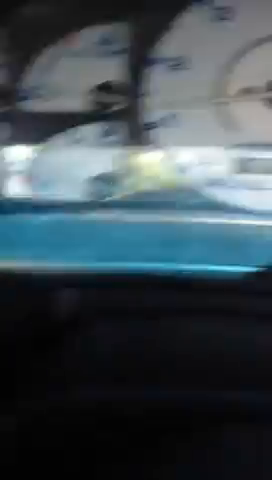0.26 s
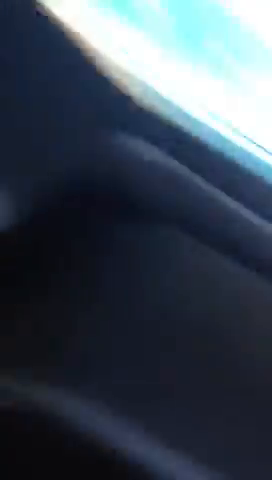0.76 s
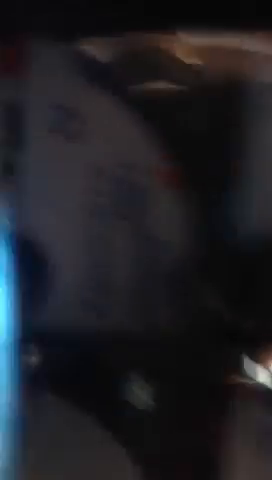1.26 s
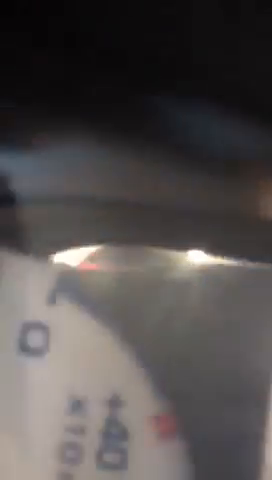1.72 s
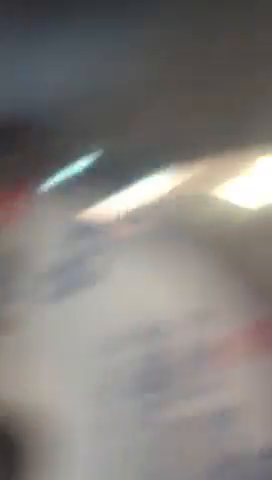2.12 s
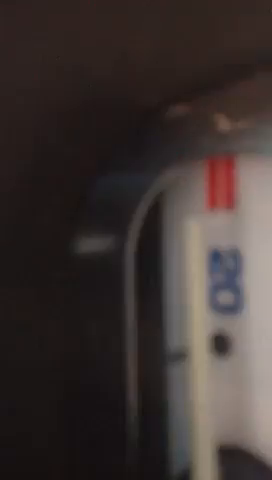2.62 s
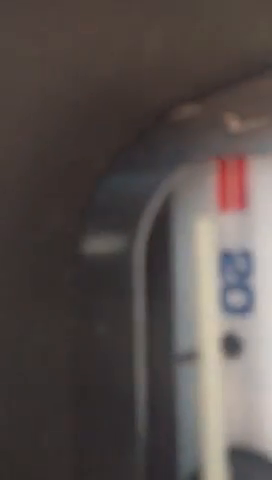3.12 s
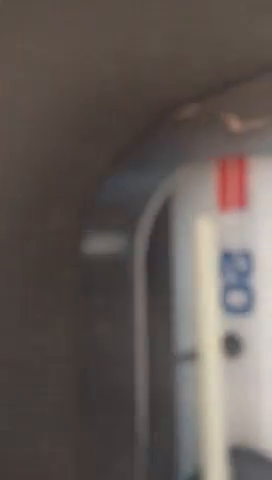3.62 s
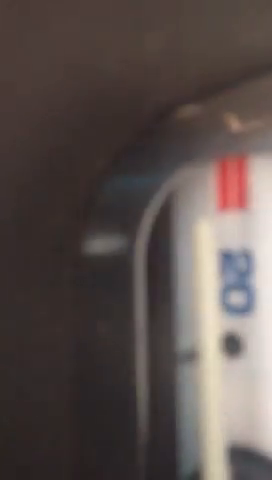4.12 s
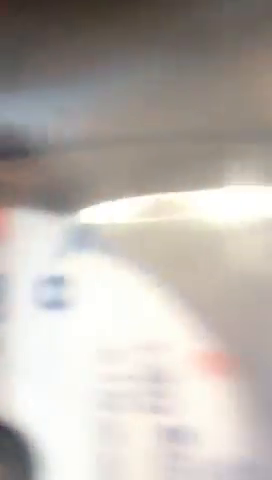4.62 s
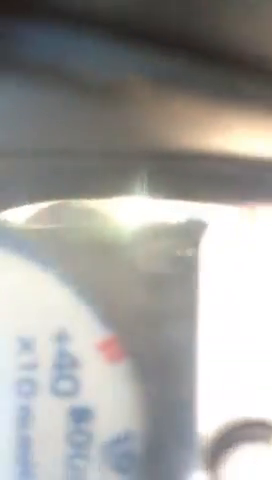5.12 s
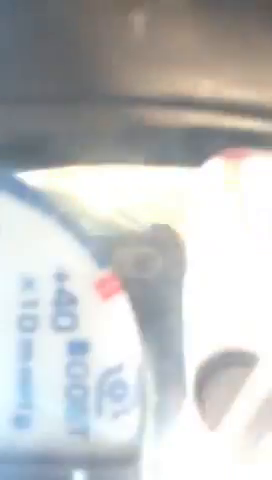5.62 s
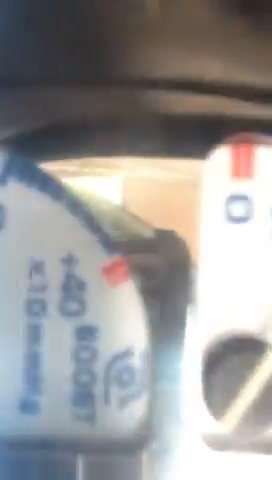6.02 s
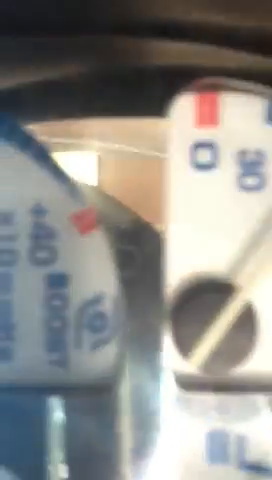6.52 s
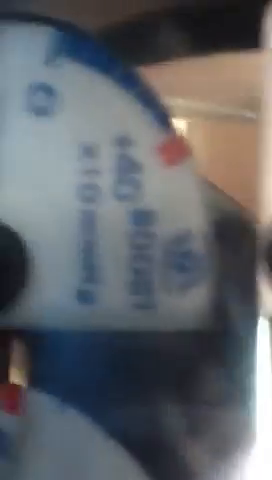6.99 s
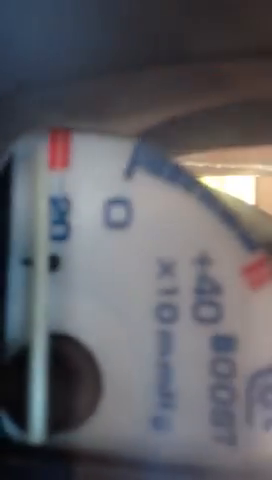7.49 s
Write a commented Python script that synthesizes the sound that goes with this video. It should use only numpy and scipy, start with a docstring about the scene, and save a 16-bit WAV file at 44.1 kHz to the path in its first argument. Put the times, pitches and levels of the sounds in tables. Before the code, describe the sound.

Lumpy engine idle in a car cabin, close handling knocks and scrapes, then the throttle opens into a droning, raspy, airy climb.

```python
"""Turbocharged rotary car with a fumbled phone

Inside the car, the engine idles while a phone is fumbled against the dashboard, then pulls away and revs up.
Each firing is a pulse that booms through exhaust and cabin resonances and shakes a piece of loose trim.
Noise that throbs with the firings makes the roar and rasp of gas and the hiss of the intake under boost.
Fingers rub the phone's case (grainy noise) and knock it (ringing thuds with noisy cracks); the trim ticks."""
import sys
import numpy as np
from scipy import signal
from scipy.fft import rfft, irfft
from scipy.io import wavfile
from scipy.ndimage import uniform_filter1d

SR = 44100
rng = np.random.default_rng(int(sys.argv[2]) if len(sys.argv) > 2 else 0)


def store_wav(level_fs):
    """Save 16-bit WAV to argv[1]."""
    pcm = np.round(np.clip(np.atleast_2d(level_fs), -1, 1) * 32767)
    wavfile.write(sys.argv[1], SR, pcm.T.astype(np.int16))


N = 341775
T = np.arange(N) / SR  # time of each sample, in seconds
SIZE = 16384  # length of filters and bursts, in samples
FREQ = np.maximum(np.fft.rfftfreq(SIZE, 1 / SR), 1)  # frequencies of a filter, in Hz
# the throttle opens once and stays open
THROTTLE_S, THROTTLE_RISE_S = 3.189, 0.22


def undb(db):
    """Turn decibels into a plain gain."""
    return 10 ** (np.asarray(db) / 20)


def unit(x):
    """Scale to an rms of 1."""
    return x / np.sqrt(np.mean(x ** 2))


def curves(table):
    """Draw each column of a table of (start_s, ..) rows as a line, sample by sample."""
    s, *columns = np.transpose(table)
    return [np.interp(T, s, column) for column in columns]


def slope(points):
    """Gain over frequency, drawn through (pitch_hz, level_db) points."""
    hz, db = np.transpose(points)
    return undb(np.interp(np.log(FREQ), np.log(hz), db))


def resonances(modes):
    """Gain over frequency of steep-sided resonances; each width is roughly that at half height."""
    power = 0
    for hz, width, db in modes:
        detuning = (FREQ / hz - hz / FREQ) * hz / width / 1.5
        power = power + (undb(db) / (1 + detuning ** 2 * 2)) ** 2
    return np.sqrt(power)


def ring(gain):
    """Impulse response with this gain over frequency, which starts at once and never before the hit."""
    cepstrum = irfft(np.log(gain + 1e-6))
    # folding the second half onto the first gives minimum phase
    cepstrum[1:SIZE // 2] *= 2
    cepstrum[SIZE // 2 + 1:] = 0
    return irfft(np.exp(rfft(cepstrum)))


def through(x, gain):
    """Pass a sound through a body with this gain over frequency."""
    return signal.fftconvolve(x, ring(gain))[:len(x)]


def noise(points, envelope=1):
    """Noise under an envelope, coloured by a spectrum, with an rms of 1."""
    return unit(through(envelope * rng.standard_normal(N), slope(points)))


def walk(rate_hz):
    """Smooth random wandering with an rms of 1."""
    k = max(int(SR / rate_hz), 2)
    steps = np.repeat(rng.standard_normal(N // k + 1), k)
    return unit(uniform_filter1d(uniform_filter1d(steps, k), k)[:N])


def add(out, s, sound):
    """Mix a sound in at a time in seconds."""
    i = int(s * SR)
    out[i:i + len(sound)] += sound[:N - i]


def swell(s, length):
    """A smooth rise and fall around a moment, both in seconds."""
    return np.cos(np.pi * np.clip((T - s) / length, -.5, .5)) ** 2


def burst(t60):
    """Noise that dies away by 60 dB in t60 seconds."""
    return rng.standard_normal(SIZE) * undb(-60 * T[:SIZE] / t60)


def firings(turns, load, load_scatter_db=1.0, misfire_s=.25, misfire_db=-15):
    """One pulse a firing, from two rotors in turn, uneven in size and timing; one misfires at idle."""
    jitter_s, idle_scatter_db = .00003, .8
    rotor_gap_db = 1.3  # one rotor fires a little harder at idle
    count = np.arange(1, int(turns[-1]) + 1)
    at = np.interp(count, turns, T)
    chance = rng.standard_normal((len(at), 2))
    idling = 1 - np.interp(at, T, load)
    scatter = load_scatter_db + idling * (idle_scatter_db - load_scatter_db)
    size = undb(chance[:, 0] * scatter + idling * rotor_gap_db * (count % 2 - 1.0))
    size[np.argmin(abs(at - misfire_s))] *= undb(misfire_db)
    # a pulse between two samples is shared out between them
    place = np.clip((at + jitter_s * chance[:, 1]) * SR, 0, N - 2)
    i = place.astype(int)
    pulses = np.zeros(N)
    pulses[i], pulses[i + 1] = size * (1 - place % 1), size * (place % 1)
    return pulses


def exhaust(pulses, hz, load, soft_hz=270, bark_db=0.0, pipe_hz=370, pipe_width_hz=70, pipe_db=0):
    """Pulses ring the cabin, booming when a harmonic meets a resonance; the throttle adds upper bark."""
    # exhaust and cabin resonances: pitch_hz [Hz], width_hz [Hz], level_db [dB, relative]
    cabin = [(69.3, 30.7, -17), (90.3, 22.8, -10), (108.2, 27, -15), (158.5, 28.7, -3.5), (186.04, 20.1, 4),
             (202.2, 21.8, 3.5), (216.9, 13.8, -1), (245.8, 49.6, -9.5), (297.7, 63.4, -10.5),
             (357, 15.6, -17.5), (380, 15, -20), (509, 47.4, -21.5), (602, 26, -29), (687, 44, -36.5),
             (790.3, 39, -26), (905, 41, -30), (1023, 55, -40)]
    boom_db = -13.5
    # a standing wave in the cabin weakens one band at the phone; half the dB remain one half-width away
    null_hz, null_half_width_hz, null_db = 128.6, 6.2, -9
    null = undb(null_db / (1 + ((FREQ - null_hz) / null_half_width_hz) ** 2))
    full = through(pulses, null * resonances(cabin))
    low_pass = signal.butter(3, soft_hz, fs=SR, output="sos")
    soft = signal.sosfiltfilt(low_pass, np.pad(full, SIZE))[SIZE:-SIZE]
    bark = load * undb(bark_db) * (full - soft)
    # the tailpipe's resonance builds up at higher revs
    pipe = signal.lfilter(*signal.iirpeak(pipe_hz, pipe_hz / pipe_width_hz, fs=SR), bark)
    boom = soft + bark + undb(pipe_db) * np.interp(hz, [60, 76], [0, 1]) * pipe
    # each harmonic's level is set by the cabin alone, however fast the firings come
    return boom * SR / hz / np.sqrt(2) * undb(boom_db)


def idle_air(turns, air_db=-44, throb=0.22):
    """Soft engine-bay noise that throbs with the firings, and two faint tones that die away early."""
    # colour of the noise: pitch_hz [Hz], level_db [dB, relative]
    air_colour = [(30, 1), (200, 11), (400, 5), (550, -5), (820, -6.5), (1120, -13), (1250, -11),
                  (1550, -16), (2500, -19.5), (5000, -26.5), (8000, -29), (15500, -38.5)]
    # faint wavering tones: pitch_hz [Hz, on average], level_db [dB, rms]
    whine = [(420, -53), (673, -56)]
    half_faded_s, fade_s = .68, 0.5
    air = undb(air_db) * noise(air_colour, np.exp(throb * np.cos(2 * np.pi * turns)))
    tones = np.zeros(N)
    for hz, db in whine:
        cycles = np.cumsum(hz * (1 + 0.0022 * walk(20))) / SR
        tones += undb(db) * np.sqrt(2) * np.sin(2 * np.pi * cycles)
    return air + tones * np.clip((half_faded_s - T) / fade_s + .5, 0, 1)


def rubbing(rub_db=2.5, grain_db=0.0, catch_db=2.5, crackle_db=-5, fidget_spread_db=2.5):
    """Skin strokes swell and fade over the case: tiny slips, and sparse crackles where it catches."""
    # colour of skin on the case: pitch_hz [Hz], level_db [dB, relative]
    skin = [(150, -23), (400, 16), (800, 11.5), (1300, 4), (2200, 2.5), (4500, 2), (5700, -1.5), (7200, 0),
            (9500, -7), (12000, -4), (15500, -11)]
    # firm strokes of fingers: middle_s [s], length_s [s], level_db [dB, before the gain rub_db]
    rubs = [(0.972, 0.11, -50.5), (1.082, .12, -58), (1.425, 0.16, -39.5), (1.538, 0.27, -46),
            (1.709, 0.084, -46), (1.841, 0.15, -38), (2.045, 0.28, -51.5), (2.164, 0.16, -42.5),
            (2.327, 0.38, -41.5), (2.461, 0.17, -35), (3.188, 0.13, -52)]
    # light fidgeting goes on between the strokes and grows until the phone comes to rest
    fidget_end_s, fidget_growth_db_per_s = 2.56, 7
    fidget_db = -56.5  # at its end, before rub_db
    strokes = sum(undb(db) * swell(s, length) for s, length, db in rubs)
    left_s = np.maximum(fidget_end_s - T, 0)
    fidget_level = fidget_db - fidget_growth_db_per_s * left_s + fidget_spread_db * walk(13.98)
    fidget = (left_s > 0) * undb(fidget_level)
    slips = noise(skin, undb(grain_db * walk(900) + catch_db * walk(60)))
    crackles = noise(skin, rng.random(N) < 250 / SR)  # about 250 a second
    return undb(rub_db) * np.hypot(strokes, fidget) * (slips + undb(crackle_db) * crackles)


def knocks(thud_db=3, crack_db=0, spread=0.91, chatter=0.04, chatter_s=0.08):
    """Each knock thuds the case's resonances, weighted by where it lands, and cracks at the contact."""
    # phone case resonances: pitch_hz [Hz], width_hz [Hz], level_db [dB, relative]
    case_modes = [(171, 160, 9.5), (378, 103, 1.5), (548, 120, -0.5), (730, 300, -2.5), (915, 110, -22),
                  (1260, 62, -18), (1710, 440, -17.5), (2260, 720, -12.5)]
    # knocks on case and trim: start_s [s], thud_db [dB, before the gain thud_db], thud_centre_hz [Hz],
    # crack_db [dB, before the gain crack_db], crack_decay_s [s, to fall 60 dB]
    hits = [(.567, -36, 805, -41.5, 0.023), (1.225, -14, 2206, -22.5, 0.081), (1.249, -18, 790, -31, 0.14),
            (1.284, -24, 885, -33, 0.053), (1.324, -7.5, 780, -31.5, 0.086), (1.403, -5, 690, -20.5, .035),
            (1.614, -9.5, 330, -22.5, 0.06), (1.619, -12.5, 650, -24, 0.066), (1.740, -25, 930, -38.5, .05),
            (1.796, -31, 750, -41, .05), (1.847, -6, 656, -24.5, 0.048), (1.883, -21, 900, -34.5, 0.085),
            (1.949, -14.5, 613, -33.5, 0.026), (2.08, -20.5, 520, -38, 0.022),
            (2.252, -22, 699.3, -35, .06), (2.443, -7.5, 510, -20.5, .044), (2.451, -12, 500, -20, 0.024),
            (2.462, -4.5, 420, -10.5, 0.023), (2.469, -14, 420, -11.5, 0.033),
            (2.489, -11.5, 450, -37, 0.11), (2.975, -41, 811, -55, 0.081), (3.191, -30, 880, -38.5, .13),
            (5.906, -16, 756, -26.5, 0.027), (5.931, -22, 1490, -29.5, 0.031),
            (6.406, -20.5, 898, -45, .023), (7.076, -9, 1210, -30, .025)]
    # colour of the cracks: pitch_hz [Hz], level_db [dB, relative]
    crack_colour = [(300, -0.5), (900, 11), (1300, 10.5), (2200, 5), (3200, 1), (4200, 0.5), (5500, -6.5),
                    (7700, -5), (9500, -12), (12500, -15.5), (15500, -17)]
    thuds, cracks, case = np.zeros(N), np.zeros(N), resonances(case_modes)
    for s, db, hz, sharp_db, t60 in hits:
        # one sharp push, then a faint noisy chatter
        push = chatter * burst(chatter_s)
        push[0] += 1
        landing = 1 / (1 + (np.log(FREQ / hz) / spread) ** 2) ** 2
        thud = through(push, case * landing)
        add(thuds, s, undb(db + thud_db) * thud / abs(thud).max())
        add(cracks, s, undb(sharp_db + crack_db) * burst(t60))
    return thuds + through(cracks, unit(slope(crack_colour)))


def ticks(tick_db=-2, t60=0.027):
    """Thin, bright clicks of plastic: short bursts of coloured noise."""
    # light clicks of case and trim: start_s [s], level_db [dB, before the gain tick_db]
    clicks = [(1.032, -35), (1.521, -27.5), (2.263, -31), (3.154, -35), (4.15, -34), (5.833, -26),
              (5.931, -17), (6.414, -35.5), (6.646, -36), (7.035, -32), (7.519, -37)]
    # colour of the clicks: pitch_hz [Hz], level_db [dB, relative]
    tick_colour = [(800, -3.5), (2500, -2.5), (4200, 3.5), (6500, -6), (9500, -8), (11500, -4), (13500, -5),
                   (15500, -5.5)]
    out = np.zeros(N)
    for s, db in clicks:
        add(out, s, undb(db + tick_db) * burst(t60))
    return through(out, unit(slope(tick_colour)))


def buzz(pulses, hz, load, uneven_db=1.0, chatter_s=0.074):
    """Under load each firing shakes loose trim into a short chatter, most of all near one firing rate."""
    # trim resonances: pitch_hz [Hz], width_hz [Hz], level_db [dB, relative]
    trim = [(1800, 140, -12.5), (2317, 120, -5.5), (2493, 240, -2.5), (3310, 420, -14.5),
            (4550, 260, -11.5)]
    buzz_db, buzz_hz, buzz_width_hz = -44, 52.85, 7
    decay = undb(-60 * T[:SIZE] / chatter_s)
    shake = signal.fftconvolve(pulses * undb(uneven_db * walk(70)), decay)[:N]
    sympathy = load / np.hypot(1, 2 * (hz - buzz_hz) / buzz_width_hz)
    chatter = unit(through(shake * rng.standard_normal(N), resonances(trim)))
    return undb(buzz_db) * sympathy * chatter


def gas(turns, hz, load, roar_throb=0.31, rasp_throb=0.24, hiss_throb=0.2, rattle_db=1.0, waver_db=0.55):
    """Roar, rasp and intake hiss come in with the throttle and throb once a firing; a whisper joins."""
    # colours of the four noises, each: pitch_hz [Hz], level_db [dB, relative]
    roar_colour, rasp_colour = [(60, -41), (150, -19), (260, 7.5), (360, 9), (440, 1.5), (520, 0.5),
                                (600, 6), (700, -3), (800, 3), (900, -3.5), (1050, -15.5), (1500, -26.5),
                                (3000, -60)], [(600, -32), (1050, 7.5), (1200, 3.5), (1380, 6), (1550, -2),
                                              (1800, 4), (2100, 1.5), (2480, 0.5), (2700, -7), (3500, -8),
                                              (4200, -14.5), (4700, -9), (5400, -24.5), (15500, -44)]
    hiss_colour, whisper_colour = [(1500, -26), (2300, -1.5), (2800, 6.5), (3500, 4), (4500, 3.5),
                                   (5300, 1), (6800, 1), (8200, -1.5), (9500, -6), (15500, -18.5)], [(6000, -31), (9800, -2.5), (11500, 4.5), (13500, -1),
                                                 (15500, -1)]
    # level of the intake hiss, before throttle, surges and engine loudness: start_s [s], level_db [dB]
    hiss_level = [(3.5, -46.5), (3.8, -50), (4.2, -49.5), (4.45, -46), (5.3, -46), (5.5, -51.5),
                  (6.0, -55.5), (6.5, -55.5), (7.75, -58)]
    # brief surges of rasp and air as the engine picks up: middle_s [s], length_s [s], gain_db [dB]
    surges = [(3.515, 0.22, 3.5), (5.36, 0.34, 4), (6.743, 0.14, 6), (7.25, 0.17, 3.5)]
    # levels before throttle, surges and engine loudness; the whisper's is at the cruising firing rate
    roar_db, rasp_db, whisper_db = -31, -44, -61.5
    cruise_hz, whisper_db_per_octave = 55, 3
    spool_s = .45  # the whisper builds as the turbo spools up
    puff = np.cos(2 * np.pi * (turns - .25))  # peaks a quarter of a cycle after each firing
    surge = undb(sum(db * swell(s, length) for s, length, db in surges) + waver_db * walk(6.1))
    roar = undb(roar_db) * noise(roar_colour, np.exp(roar_throb * puff))
    rasp = undb(rasp_db) * noise(rasp_colour, np.exp(rasp_throb * puff) * undb(rattle_db * walk(180)))
    hiss_envelope = np.exp(hiss_throb * puff) * undb(1.2 * walk(50))
    hiss = undb(curves(hiss_level)[0]) * noise(hiss_colour, hiss_envelope)
    whisper_level = whisper_db + whisper_db_per_octave * np.log2(hz / cruise_hz)
    whisper = undb(whisper_level) * noise(whisper_colour)
    spool = 1 - np.exp(-np.maximum(T - THROTTLE_S, 0) / spool_s)
    # the second factor of load makes the intake air build up later than the exhaust
    return load * (roar + surge * (rasp + load * (hiss + spool * whisper)))


def scene(idle_load=0.11, gas_follows_loudness=0.43):
    """The engine, the trim that it shakes, and the phone being handled close by."""
    # engine speed, before the extra at idle: start_s [s], firing_rate_hz [Hz]
    speed = [(3.17, 34.05), (3.3, 38.2), (3.4, 44.7), (3.48, 49.9), (3.53, 52.7), (3.65, 58.23),
             (3.82, 59.62), (4.22, 56.45), (4.69, 52.97), (5.27, 47.76), (5.5, 55.08), (5.81, 61.17),
             (6.15, 68.0), (6.41, 71.3), (6.52, 74.3), (6.6, 76.75), (6.79, 77.3), (6.95, 81.5),
             (7.25, 84.7), (7.75, 91.22)]
    # loudness of the engine at the phone; it dips after the last big knocks and partly recovers,
    # then rises as the throttle opens: start_s [s], level_db [dB, relative]
    loudness = [(0, -11.5), (2.44, -14), (2.54, -20.5), (3.22, -16.5), (3.29, -9.5), (3.5, -4),
                (3.85, -0.5), (5.2, -1), (6.0, 1.2), (6.6, -0.5), (7.75, 2.3)]
    # the idle starts a little fast and settles
    idle_extra_hz, idle_settle_s = 1.1, 1.1
    hz = curves(speed)[0] + idle_extra_hz * np.exp(-T / idle_settle_s)
    load = np.clip((T - THROTTLE_S) / THROTTLE_RISE_S, 0, 1)
    loudness_db = curves(loudness)[0]
    turns = np.cumsum(hz) / SR + .45  # goes up by 1 each firing
    pulses = firings(turns, load)
    boom = exhaust(pulses, hz, np.maximum(load, idle_load))
    shaken = undb(loudness_db) * (boom + buzz(pulses, hz, load))
    air = idle_air(turns) + undb(gas_follows_loudness * loudness_db) * gas(turns, hz, load)
    return (shaken + air + rubbing() + knocks() + ticks())[None]


def record(dry):
    """The phone rounds off the highest peaks and cuts the top."""
    ceiling, top_hz = .8, 15500
    rounded = dry / (1 + (dry / ceiling) ** 10) ** (1 / 10)
    return signal.sosfilt(signal.ellip(10, .2, 80, top_hz, fs=SR, output="sos"), rounded)


dry = scene()
out = record(dry)
store_wav(out)
```